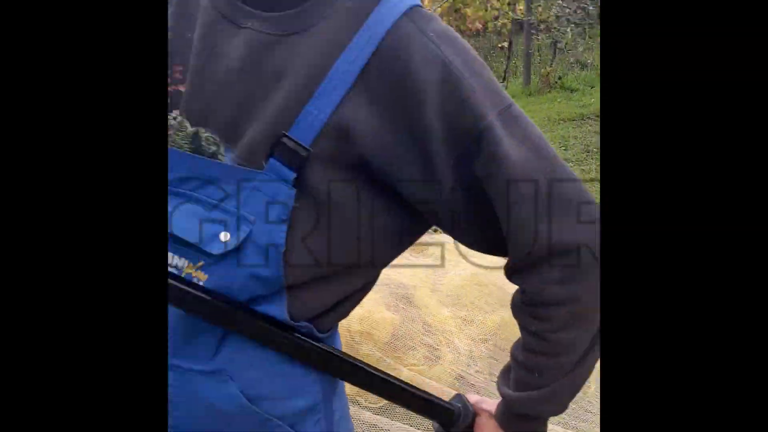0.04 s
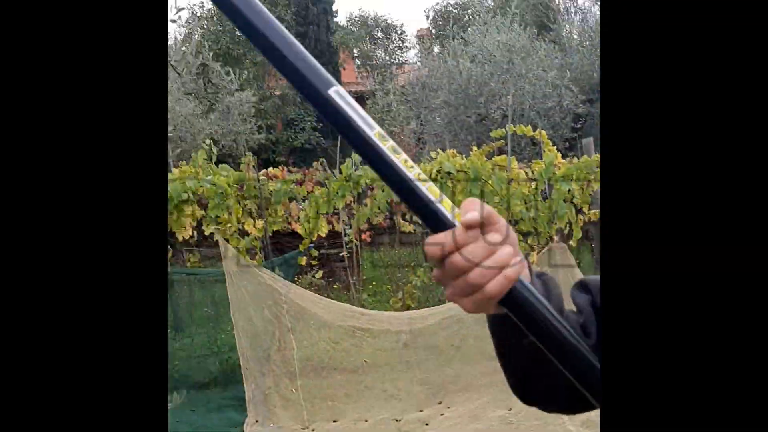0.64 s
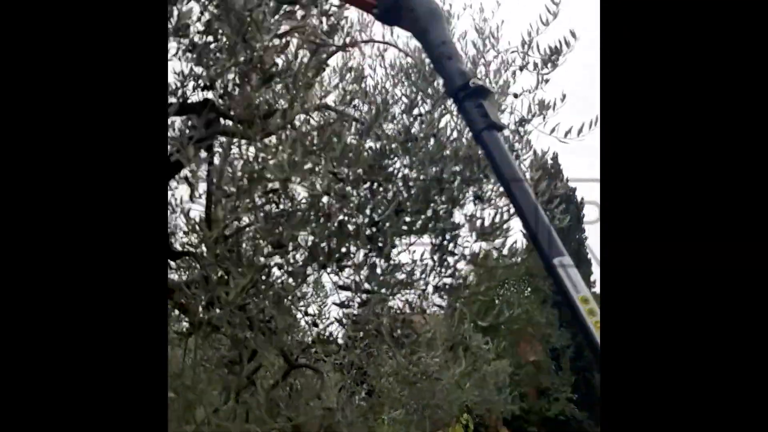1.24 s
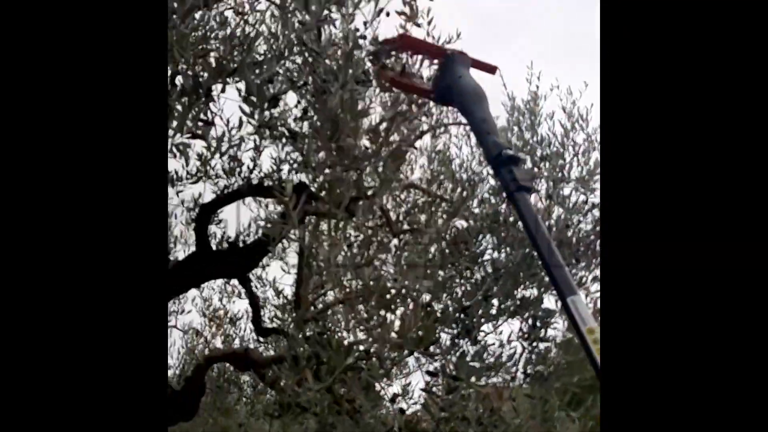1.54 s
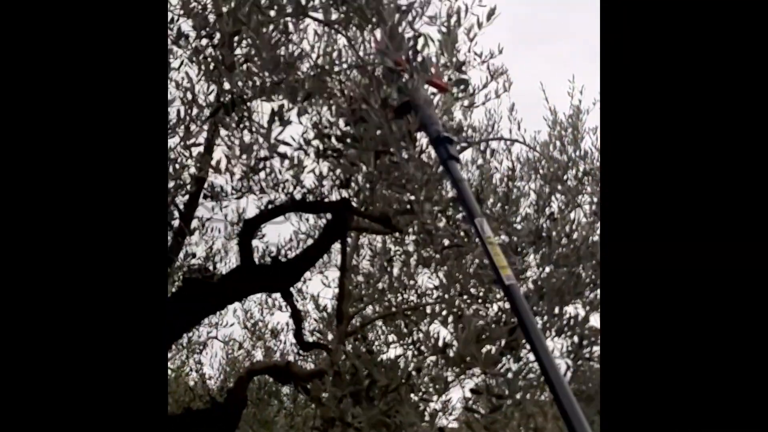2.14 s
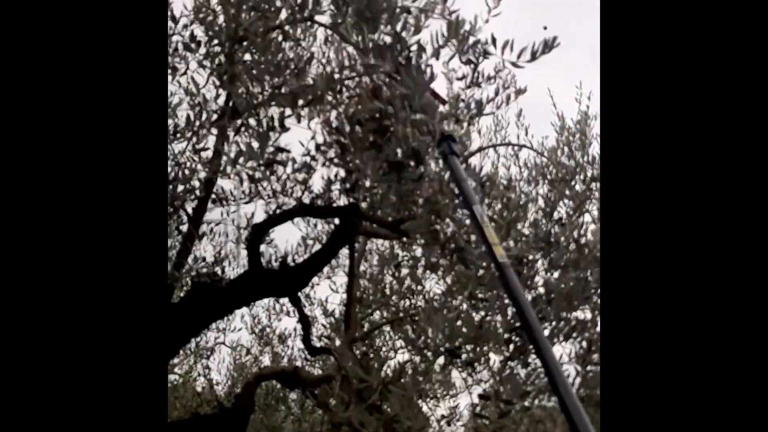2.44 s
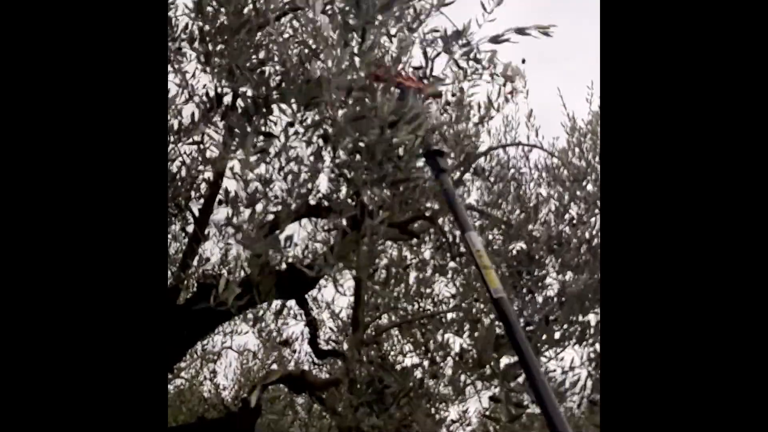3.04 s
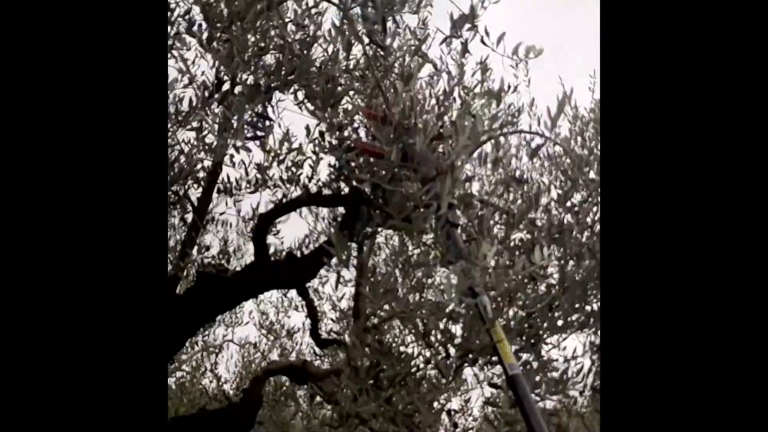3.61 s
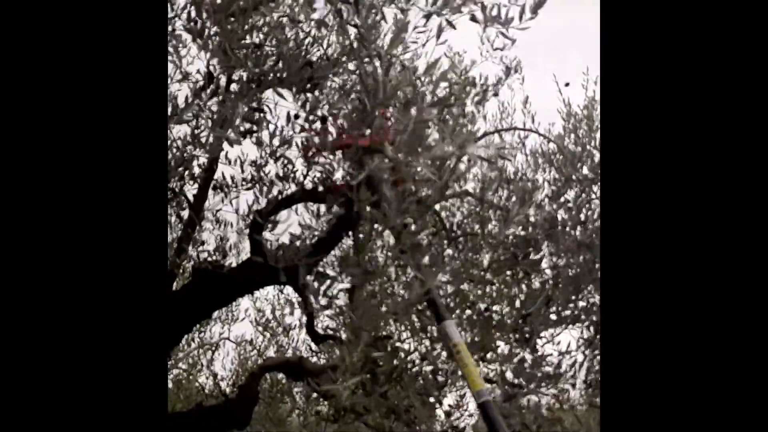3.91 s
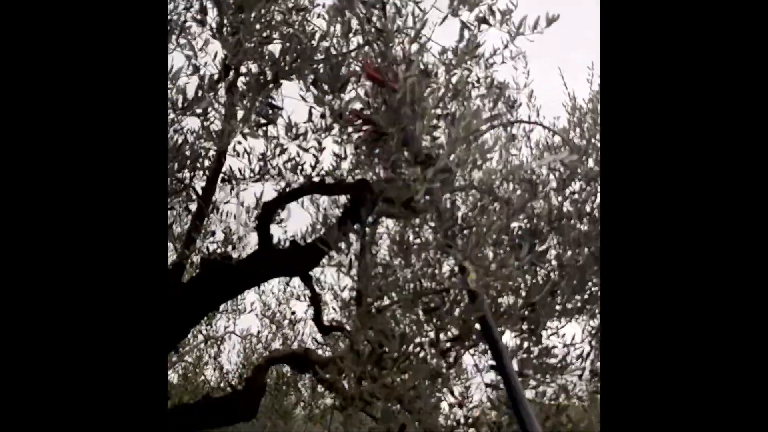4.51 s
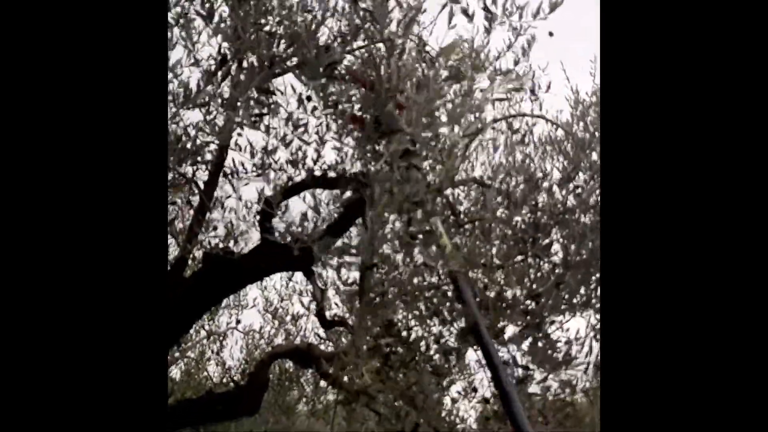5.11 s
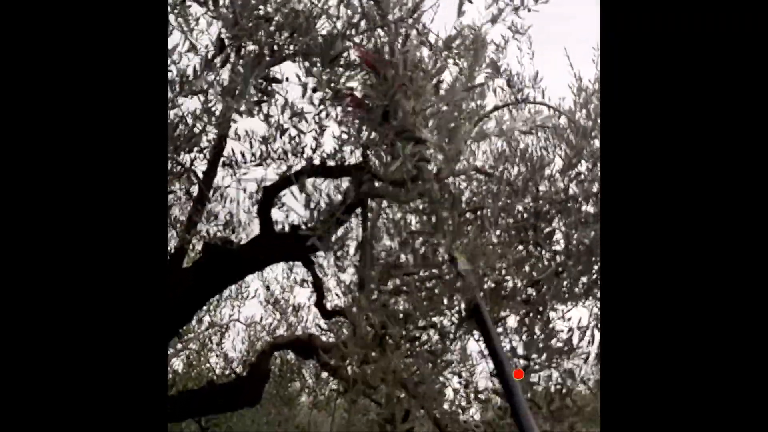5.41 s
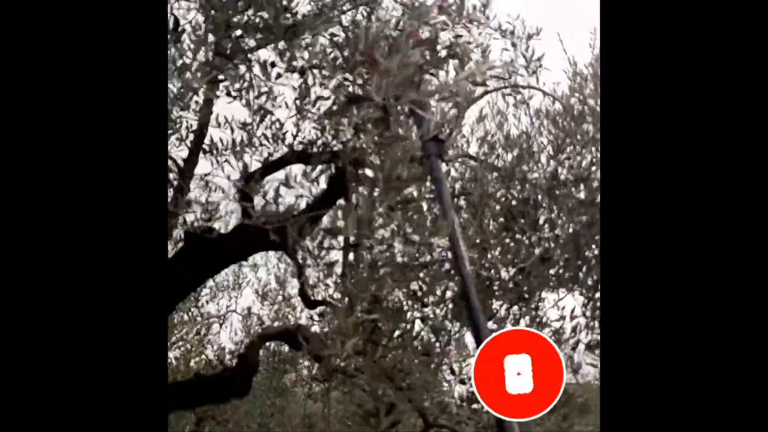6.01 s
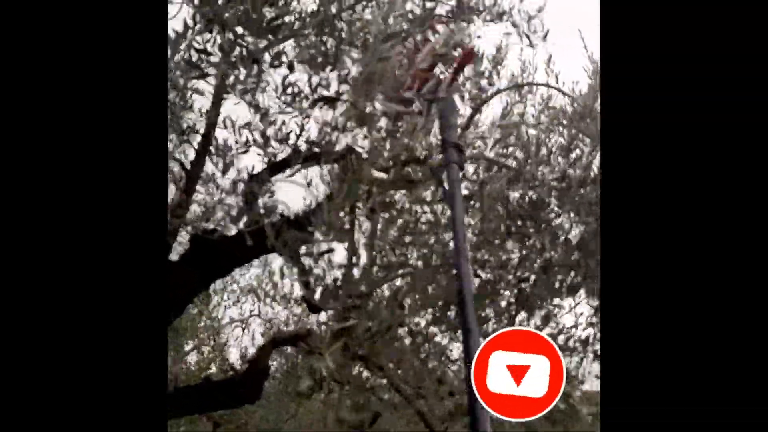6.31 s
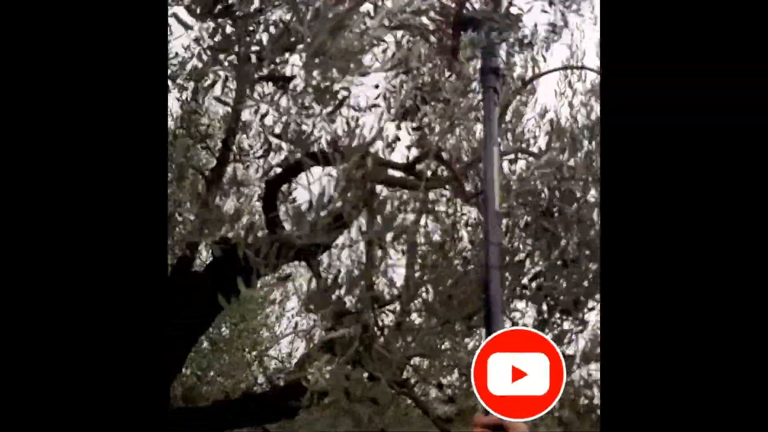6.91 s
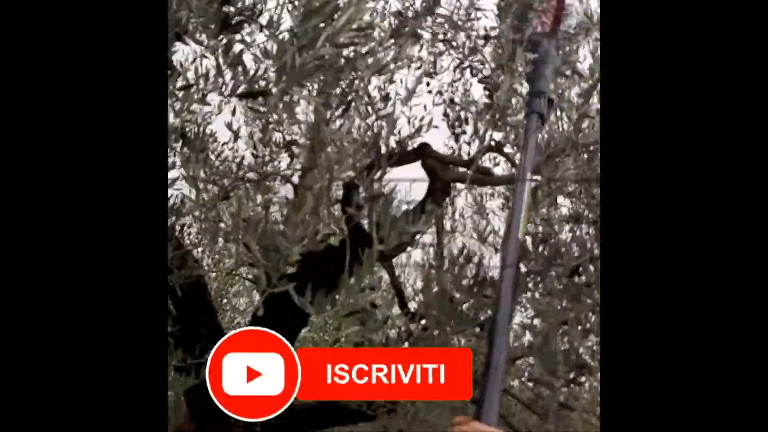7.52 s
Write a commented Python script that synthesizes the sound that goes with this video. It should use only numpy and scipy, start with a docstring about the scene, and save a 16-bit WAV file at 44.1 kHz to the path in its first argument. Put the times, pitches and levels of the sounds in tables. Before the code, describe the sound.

A battery-powered pole shaker rattles rapidly and continuously outdoors for almost eight seconds, slightly louder on the right. Around 0.5 seconds the hollow pole passes close, with sharp metallic knocking, gear rasp and a fluttering motor whine. From about 1 second its ringing rods and plastic head clatter in an olive tree, beating dry twigs, rustling leaves and drumming on wood, with a few light cracks up to 1.4 seconds. At about 2.3 seconds the rattle slows a little and the whine drops and weakens. Louder drumming and sharp branch cracks come between 3.6 and 4.3 seconds as the motor picks up, then it sags again near 4.7 seconds. From 6 seconds the rattle pulses more distinctly, the leaves thrash harder and a run of whacks follows until 6.7. Pole knocking grows again at the end, with two more cracks around 7.5 seconds. Faint open-air rumble lies underneath.

```python
"""A battery olive shaker on a long pole, lifted past a phone and worked into the crown of a tree.
One crank times the machine: the motor whines, the linkage knocks in the pole and the plastic head,
the gear rasps once a turn. Two rakes of rods rattle on the out and back strokes, thrash twigs and
leaves, and crack and drum on branches, whose load slows the crank. Open air rumbles faintly."""
import sys
import numpy as np
from scipy import signal
from scipy.fft import rfft, irfft
from scipy.io import wavfile

SR = 44100
rng = np.random.default_rng(int(sys.argv[2]) if len(sys.argv) > 2 else 0)


def pcm_store(signal):
    """Save signal as 16-bit PCM."""
    levels = np.round(np.clip(np.atleast_2d(signal), -1, 1) * 32767)
    wavfile.write(sys.argv[1], SR, levels.astype(np.int16).T)


N = 341775
TIME = np.arange(N) / SR
FREQS = np.maximum(np.arange(N // 2 + 1) * SR / N, 1)

# freer rods mark each stroke more: (time [s], stroke depth [1 = usual])
ROD_SWING = [(0, .7), (1.5, .5), (2.3, 1), (3.7, .65), (5.2, .8), (5.8, 1.2), (6.1, 2.1), (6.8, 2.2),
             (7.7, 1.9)]


def undb(db):
    """Decibels to gain."""
    return 10 ** (np.asarray(db) / 20)


def curves(table):
    """Each value column, interpolated linearly in time."""
    time_s, *columns = np.transpose(table)
    return [np.interp(TIME, time_s, column) for column in columns]


def colour(x, spectrum):
    """Filter by (frequency [Hz], gain [dB]) points."""
    hz, db = np.transpose(spectrum)
    return irfft(rfft(x) * undb(np.interp(np.log(FREQS), np.log(hz), db)), N)


def resonate(x, modes):
    """Parallel damped modes of alternating sign: (frequency [Hz], width [Hz], gain [dB])."""
    response = sum((-1) ** k * undb(db) / (1 + 1j * (FREQS / hz - hz / FREQS) * hz / width_hz)
                   for k, (hz, width_hz, db) in enumerate(modes))
    return irfft(rfft(x) * response, N)


def unit(x, band_hz):
    """Scale stereo to a mid-channel rms of 1 within a band."""
    mid = irfft(rfft(x.mean(axis=0)) * (FREQS > band_hz[0]) * (FREQS < band_hz[1]), N)
    return x / np.std(mid)


def drift(rate_hz):
    """Smooth random drift, spread near 1."""
    knots = signal.resample_poly(rng.standard_normal(int(N / SR * rate_hz) + 2), 8, 1)
    return np.interp(TIME * rate_hz * 8, np.arange(len(knots)), knots)


def contacts(times_s, sizes, decay_s):
    """A dying burst of chatter per contact; the shortest are single clean blows."""
    energy = np.bincount(np.clip(times_s * SR, 0, N - 1).astype(int), sizes ** 2, N)
    envelope = np.sqrt(signal.lfilter([1], [1, -np.exp(-1 / (decay_s * SR))], energy + 1e-18))
    return envelope * np.sign(rng.standard_normal(N))


def patter(count, scatter_db, decay_s):
    """Contacts of random time and strength, rms 1."""
    x = contacts(rng.uniform(0, N / SR, count), undb(scatter_db * rng.standard_normal(count)), decay_s)
    return x / np.std(x)


def clacks(turns, slop_turns, scatter_db, decay_s):
    """The linkage strikes at set crank angles, with jitter in time and force; rms 1."""
    # strikes per turn: (angle [turns], level [dB])
    strikes = [(.09, -1.5), (.32, 0), (.44, -.5), (.54, -2), (.69, -.5), (.86, 0), (.96, 0)]
    angle, db = np.transpose(strikes)
    strike_turns = np.arange(int(turns[-1]) + 1)[:, None] + angle
    jitter = rng.standard_normal((*strike_turns.shape, 2))
    times_s = np.interp(strike_turns + slop_turns * jitter[..., 0], turns, TIME)
    in_scene = (strike_turns > turns[0]) & (strike_turns < turns[-1])
    sizes = undb(db + scatter_db * jitter[..., 1]) * in_scene
    x = contacts(times_s.ravel(), sizes.ravel(), decay_s)
    return x / np.std(x)


def stroke(turns, once_db, once_at, twice_db, twice_at, uneven_db):
    """Force over a turn: one crank swell, two out-and-back swells; *_at in turns."""
    crank_db = once_db * np.cos(2 * np.pi * (turns - once_at))
    out_back_db = twice_db * np.cos(4 * np.pi * (turns - twice_at))
    return undb(crank_db + out_back_db + uneven_db * drift(30))


def sides(x):
    """The phone's right port faces the work and hears it louder."""
    # right over left: (frequency [Hz], gain [dB])
    right_port = [(200, 3), (800, 2.5), (1400, 0.5), (1750, 5.5), (2100, 11), (2450, 6.5), (2900, 4),
                  (4400, 3.5), (5100, 2.5), (6100, 3.5), (7200, -1.5), (9500, 5.5), (15000, 3)]
    return np.array([x[0], colour(x[1], right_port)])


def ports(x, lag_s, scatter_db, scatter_s=.0027, shift_hz=4):
    """The left port hears first; shaking foliage adds short, colourless, shifting scatter."""
    direct = np.array([x, irfft(rfft(x) * np.exp(-2j * np.pi * FREQS * lag_s), N)])
    taps, lead = 4096, 64
    spectra = rfft(rng.standard_normal((4, 2, taps)) * np.exp(-TIME[:taps] / scatter_s))
    paths = np.roll(irfft(spectra / np.abs(spectra)), lead, axis=-1)[..., :taps // 2]
    shares = np.array([drift(shift_hz) for _ in paths])
    shares /= np.linalg.norm(shares, axis=0)
    scatter = sum(share * signal.oaconvolve(x[None], path, axes=1)[:, lead:N + lead]
                  for share, path in zip(shares, paths))
    return sides(direct + undb(scatter_db) * scatter)


def passing(closest_s, half_power_s, peak_db):
    """Gain of a part of the pole sliding past the phone."""
    return undb(peak_db) / np.sqrt(1 + ((TIME - closest_s) / half_power_s) ** 4)


def housing(turns):
    """The reversing rakes knock the hollow plastic head."""
    # head resonances: (frequency [Hz], width [Hz], gain [dB])
    modes = [(738, 230, -4), (827, 176, 2), (959, 160, -0.5), (1179, 112, -4.5), (1572, 310, -4.5)]
    blows = clacks(turns, slop_turns=.015, scatter_db=0, decay_s=.0048)
    blows += 1.2 * patter(count=2500, scatter_db=5, decay_s=.0036)
    blows *= stroke(turns, once_db=.5, once_at=.76, twice_db=0, twice_at=.45, uneven_db=.2)
    body = colour(resonate(blows, modes), [(150, -28), (600, 0), (1700, -1.5), (3500, -20)])
    return undb(-37.5) * unit(ports(body, lag_s=.00003, scatter_db=-8, scatter_s=.006), (600, 1700))


def rods(turns):
    """Loose rods are struck, chatter and ring, each at a slightly different pitch."""
    # ring as twigs press and let go: (time [s], level before trim [dB], centre [Hz])
    ring_curve = [(0, -22, 2030), (0.25, -40, 2290), (0.6, -28.5, 2180), (0.86, -28, 2120),
                  (1.02, -22, 2170), (1.2, -22.5, 2170), (1.52, -23.5, 2120), (1.8, -37, 2220),
                  (2.03, -25, 2140), (2.25, -35, 2191), (2.55, -33, 2100), (2.9, -26.5, 2195),
                  (3.22, -32, 2037), (3.42, -27.5, 2040), (3.58, -19.5, 2100), (3.8, -22.5, 2140),
                  (4.03, -27, 2210), (4.32, -21, 2210), (4.6, -32, 2110), (5.3, -33.5, 2149),
                  (5.95, -34.5, 2100), (6.15, -29, 2114), (6.55, -27.5, 2167), (7.1, -35, 2056),
                  (7.4, -34, 2160), (7.75, -33.5, 2100)]
    ring_db, ring_hz = curves(ring_curve)
    swing, = curves(ROD_SWING)
    ring_s, spread_hz, trim_db = .0028, 50, -.2
    turns = turns + .03  # struck slightly early so the ring swells on the beat
    blows = clacks(turns, slop_turns=.012, scatter_db=1, decay_s=5e-6)
    blows += .55 * patter(count=4000, scatter_db=2.5, decay_s=.002)
    blows *= stroke(turns, once_db=1.4, once_at=.03, twice_db=1.9, twice_at=.49, uneven_db=.2) ** swing
    # moving resonance: shift to 0 Hz, decay, shift back
    carrier = np.exp(2j * np.pi * np.cumsum(ring_hz + spread_hz * drift(90)) / SR)
    envelope = signal.lfilter([1], [1, -np.exp(-1 / (ring_s * SR))], blows / carrier)
    envelope = signal.sosfilt(signal.butter(2, 200, fs=SR, output="sos"), envelope)
    ring = ports(np.real(carrier * envelope), lag_s=.00038, scatter_db=-12, scatter_s=.0052)
    overtone = ports(resonate(blows, [(4380, 200, 0)]), lag_s=.00024, scatter_db=-8)
    heard = unit(ring, (1900, 2500)) + undb(-15) * swing * unit(overtone, (4000, 4800))
    return undb(ring_db + trim_db) * heard


def shaft(turns):
    """The linkage rings the hollow pole with sharp metallic knocks."""
    # pole resonances: (frequency [Hz], width [Hz], gain [dB])
    modes = [(835, 130, -3), (1640, 440, -2.5), (2060, 320, 2.5), (2432, 88, 8.5), (2820, 410, 3),
             (3316, 160, 7), (3740, 290, 0.5), (4150, 75, 6), (4540, 210, 8.5), (6200, 900, -10),
             (6600, 80, -6), (7100, 360, -4)]
    # louder as the pole is drawn back upright: (time [s], level [dB])
    aloft = [(2.5, -50), (5.2, -44), (6.5, -42.5), (7.4, -35.5)]
    blows = clacks(turns, slop_turns=.007, scatter_db=1.1, decay_s=.0035)
    blows += .5 * patter(count=5000, scatter_db=3.5, decay_s=.0015)
    blows *= stroke(turns, once_db=.9, once_at=.03, twice_db=.8, twice_at=.47, uneven_db=.3)
    tube = colour(resonate(blows, modes),
                  [(200, -14), (750, -1), (1300, 1), (2000, -3), (7100, -2), (8100, -40), (16000, -14)])
    gain = np.hypot(passing(closest_s=.43, half_power_s=.6, peak_db=-23.5), undb(curves(aloft)[0]))
    return gain * unit(ports(tube, lag_s=.00028, scatter_db=-9), (2700, 5000))


def gear_rasp(turns):
    """The gear rasps with each clack, most on the loaded part of the turn."""
    # rasp: (frequency [Hz], gain [dB])
    spectrum = [(2500, -34), (4700, -10), (5400, -4), (6000, -1.5), (6800, -1.5), (7300, 0), (8000, -6),
                (8500, -37), (9600, -27), (16000, -25)]
    rasp = clacks(turns, slop_turns=.006, scatter_db=1.2, decay_s=.0035)
    rasp += .55 * patter(count=7000, scatter_db=4.5, decay_s=.001)
    rasp *= stroke(turns, once_db=4, once_at=0, twice_db=-.4, twice_at=.5, uneven_db=-.4)
    heard = ports(colour(rasp, spectrum), lag_s=.0002926, scatter_db=-2, shift_hz=15)
    gain = np.hypot(passing(closest_s=.57, half_power_s=.38, peak_db=-27.5), undb(-40.5))
    return gain * unit(heard, (5500, 8000))


def gear_ring(turns):
    """The gear's steel ticks and rings high up, swelling once a turn."""
    # steel resonances: (frequency [Hz], width [Hz], gain [dB])
    modes = [(9240, 140, -0.5), (9570, 130, -1.5), (15800, 150, -2)]
    # steel ring: (time [s], level [dB])
    level = [(0, -48), (0.55, -36.5), (1.25, -46.5), (1.75, -40.5), (2.4, -50), (4.3, -49), (4.8, -54),
             (6.1, -55), (6.45, -43), (6.9, -57), (7.75, -53)]
    ticks = clacks(turns, slop_turns=.008, scatter_db=2, decay_s=.004)
    ticks *= stroke(turns, once_db=4, once_at=.78, twice_db=1, twice_at=.38, uneven_db=.5)
    heard = ports(resonate(ticks, modes), lag_s=.000288, scatter_db=1)
    return undb(curves(level)[0]) * unit(heard, (9100, 9800))


def motor(turns):
    """The drive whines over a faint hum, surging with each stroke, fluttering as the load jerks it."""
    # whine: (time [s], pitch [Hz], level [dB])
    whine = [(0, 888, -42.5), (0.3, 830, -34), (0.6, 812, -43.5), (1.2, 813, -38), (1.6, 792, -39.5),
             (2.05, 795, -40.5), (2.35, 696, -51.5), (2.9, 705, -44), (3.45, 680, -48.5), (4.0, 801, -44),
             (4.3, 814, -41), (4.65, 630, -50.5), (5.2, 655.4, -49.5), (6.4, 713, -50.5), (7.75, 703, -53)]
    hz, db = curves(whine)
    surge_rad, flutter_rad, hum_per_turn = .9, .42, 9
    phase = 2 * np.pi * np.cumsum(hz) / SR + surge_rad * np.sin(4 * np.pi * turns)
    phase += flutter_rad * (drift(30) + drift(120))
    hum = np.sin(2 * np.pi * hum_per_turn * turns + drift(30))
    tone = np.sin(phase) + undb(-10) * np.sin(2 * phase) + undb(-26) * hum
    tone *= stroke(turns, once_db=1.8, once_at=.7, twice_db=2.5, twice_at=.36, uneven_db=.8)
    tone *= undb(2.5 * drift(200))
    return undb(db) * unit(ports(tone, lag_s=.0001, scatter_db=-14), (500, 1000))


def twigs(turns):
    """Rods beat the twigs in a dry clatter."""
    # clatter: (frequency [Hz], gain [dB])
    spectrum = [(200, -41), (500, -15), (1000, -7), (1800, -6.5), (2650, 3), (3150, -7.5), (3550, -4),
                (3950, 0), (4400, 2.5), (4850, -6.5), (5450, -.5), (6600, -9.5), (8400, -18.5),
                (16000, -34)]
    # rakes sweep in and out of the twigs: (time [s], level before trim [dB])
    level = [(0, -31), (0.9, -31.5), (1.45, -28.5), (2.0, -31.5), (2.3, -32), (2.85, -34), (3.2, -30),
             (3.7, -31), (4.3, -34.5), (4.5, -28.5), (4.68, -32), (5.2, -34), (6.0, -32), (6.5, -30.5),
             (6.95, -33.5), (7.3, -33.5), (7.75, -32.5)]
    trim_db = .5
    swing, = curves(ROD_SWING)
    blows = clacks(turns, slop_turns=.02, scatter_db=1.5, decay_s=.005)
    blows += 1.2 * patter(count=5500, scatter_db=3.6, decay_s=.001)
    blows *= stroke(turns, once_db=.7, once_at=.13, twice_db=.8, twice_at=.43, uneven_db=.4) ** swing
    heard = ports(colour(blows, spectrum), lag_s=.00023, scatter_db=-3, scatter_s=.0049)
    return undb(curves(level)[0] + trim_db) * unit(heard, (2700, 5000))


def leaves(turns):
    """Leaves rustle all round the head; fine, sharp ticks sound within the rustle."""
    # rustle: (frequency [Hz], gain [dB])
    spectrum = [(1500, -7.5), (3100, 2), (4000, 11.5), (7600, 3.5), (8500, -11), (9900, -2.5),
                (11500, -3.5), (12400, 3), (13800, -.5), (15000, 0), (15700, -6)]
    # thrashing of the foliage: (time [s], level before trim [dB])
    level = [(0, -38), (1.3, -40), (2.4, -44.5), (3.3, -42.5), (4.2, -41.5), (5.0, -45), (5.6, -42),
             (6.5, -37.5), (7.1, -39), (7.75, -40.5)]
    trim_db = -1.54
    rustle = lambda: patter(count=14000, scatter_db=2.5, decay_s=.002)
    ticks = .5 * patter(count=400, scatter_db=4, decay_s=.00025)
    ticks += .5 * patter(count=450, scatter_db=3, decay_s=.004)
    near = ports(colour(.6 * rustle() + ticks, spectrum), lag_s=.0002644, scatter_db=-12)
    around = sides([colour(rustle(), spectrum) for _ in range(2)])
    heard = near + .9 * around
    heard *= stroke(turns, once_db=.7, once_at=.1, twice_db=.3, twice_at=.45, uneven_db=.2)
    return undb(curves(level)[0] + trim_db) * unit(heard, (10000, 15000))


def outdoors():
    """Faint rumble of open air, nearly the same at both ports."""
    # rumble: (frequency [Hz], gain [dB])
    spectrum = [(20, -28), (40, -6), (60, -1.5), (76, 1), (105, -6.5), (140, -6), (200, -7), (270, -2),
                (350, -7), (500, 2), (900, -32), (3000, -40)]
    air = rng.standard_normal(N) + .066 * rng.standard_normal((2, N))
    return undb(-35) * sides(colour(air * undb(.9 * drift(7.7)), spectrum))


def whacks():
    """A rod meets a thick branch with a sharp crack and rings."""
    # hard hits: (time [s], relative strength [dB])
    hits = [(0.7631, -14), (1.1222, -9), (1.3916, -9), (3.6241, -11), (3.695, -3), (3.7804, -6),
            (4.1748, -4), (4.264, -6), (6.0965, -4), (6.2346, -6), (6.3653, -9), (6.4435, -7), (6.59, -8),
            (6.719, -8), (7.4824, -5.5), (7.6863, -3.5)]
    times_s, db = np.transpose(hits)
    wood_spectrum = [(400, -16), (900, -2), (2200, 8), (3100, -2), (4400, 14), (6000, 0),
                     (8500, -19), (15000, -14)]
    crack = undb(-25) * colour(contacts(times_s, undb(db), decay_s=.005), wood_spectrum)
    ring = undb(24) * resonate(contacts(times_s, undb(db), decay_s=5e-6), [(2160, 75, 0)])
    return ports(crack + ring, lag_s=.00031, scatter_db=-32)


def branches(turns):
    """The rakes lean on branches and drum on the wood; each branch has its own note."""
    # leans: (start [s], length [s], level before filter [dB], note [Hz], overtone [Hz])
    leans = [(1.145, 1.04, -35, 1550, 5360), (2.35, 1.22, -39.5, 1490, 5530), (3.34, 1.32, -33, 1441, 5360),
             (4.6, 1.38, -44, 1340, 5350), (7.35, 0.65, -42.5, 1450, 5470)]
    # resonances of all branches: (frequency [Hz], width [Hz], gain [dB])
    wood_modes = [(1100, 100, -4), (2730, 59, -8)]
    blows = clacks(turns, slop_turns=.015, scatter_db=1.1, decay_s=.005)
    blows += patter(count=3500, scatter_db=3, decay_s=.0013)
    blows *= stroke(turns, once_db=3.7, once_at=.1, twice_db=.5, twice_at=.55, uneven_db=0)
    wood = resonate(blows, wood_modes)
    drumming = np.zeros(N)
    for start_s, length_s, db, note_hz, overtone_hz in leans:
        drum = wood + resonate(blows, [(note_hz, 186, 5.5), (overtone_hz, 410, 5.5)])
        swell = np.sin(np.pi * np.clip((TIME - start_s) / length_s, 0, 1))
        drumming += undb(db) * swell * drum / np.std(drum)
    drumming = colour(drumming, [(400, -7), (1100, 4), (5800, 5.5), (8000, 2)])
    return ports(drumming, lag_s=.0001, scatter_db=-3)


def scene():
    """Head, pole and tree on one crank angle, plus whacks and open air."""
    # crank, slowed by the branches: (time [s], speed [turns/s])
    crank = [(0.0, 13.86), (0.25, 16.56), (0.55, 16.93), (1.0, 16.87), (1.3, 16.41), (1.6, 15.98),
             (2.0, 15.94), (2.3, 14.48), (2.6, 14.1), (2.9, 14.62), (3.15, 13.64), (3.45, 13.84),
             (3.75, 14.3), (4.0, 15.06), (4.3, 15.77), (4.55, 13.15), (4.8, 12.34), (5.1, 13.47),
             (5.4, 13.62), (5.75, 13.68), (6.1, 14.4), (6.4, 14.74), (6.7, 14.78), (7.0, 13.97),
             (7.25, 14.02), (7.5, 14.59), (7.75, 14.66)]
    turns = .5 + np.cumsum(curves(crank)[0]) / SR
    head = housing(turns) + rods(turns)
    pole = shaft(turns) + gear_rasp(turns) + gear_ring(turns) + motor(turns)
    tree = twigs(turns) + leaves(turns) + branches(turns) + whacks()
    return head + pole + tree + outdoors()


def record(dry):
    """The phone rounds the loudest peaks and cuts the deepest bass and the top."""
    low_hz, top_hz = 38, 15850
    rounded = 2 * np.tanh(dry / 2)
    thinned = signal.sosfilt(signal.butter(3, low_hz, "high", fs=SR, output="sos"), rounded)
    return signal.sosfilt(signal.ellip(12, .2, 80, top_hz, fs=SR, output="sos"), thinned)


dry = scene()
out = record(dry)
pcm_store(out)
```